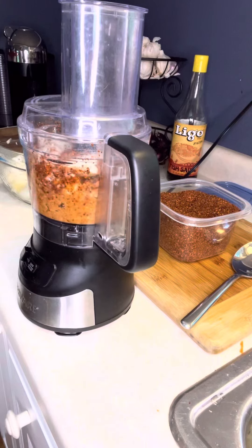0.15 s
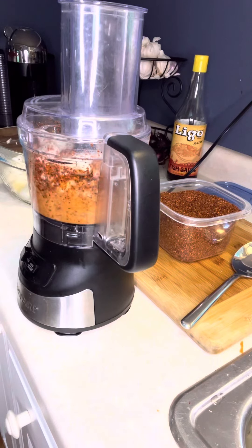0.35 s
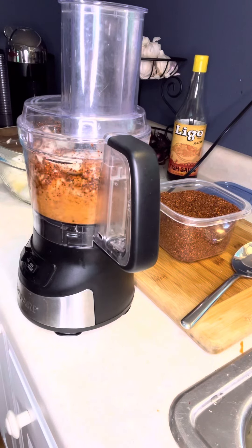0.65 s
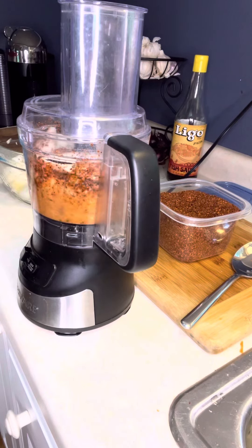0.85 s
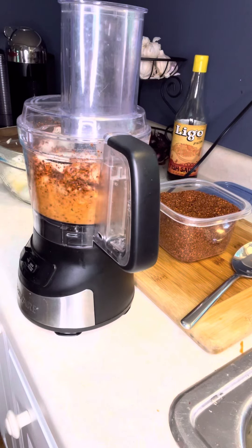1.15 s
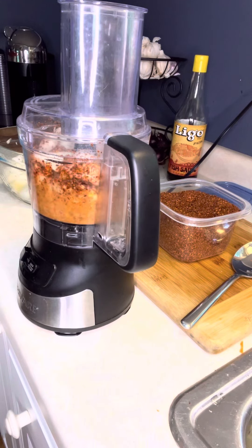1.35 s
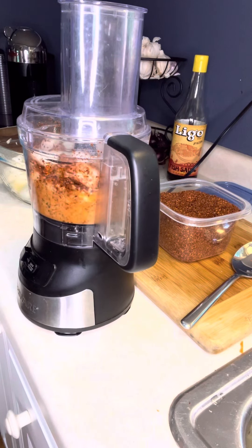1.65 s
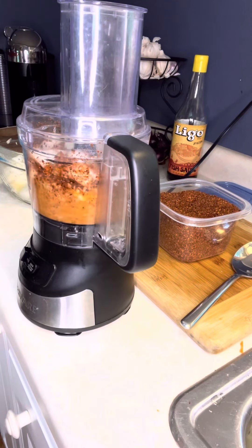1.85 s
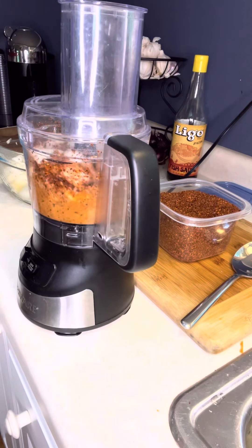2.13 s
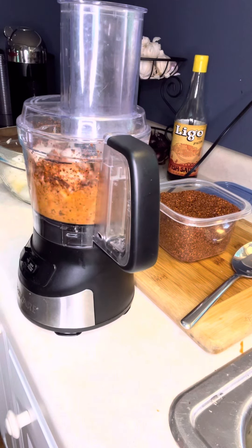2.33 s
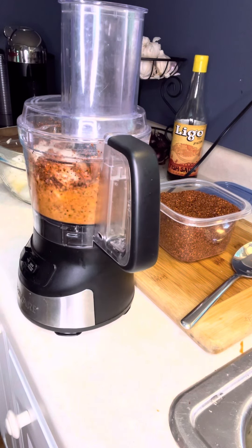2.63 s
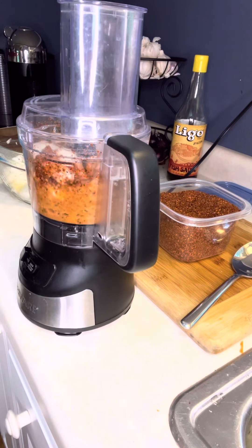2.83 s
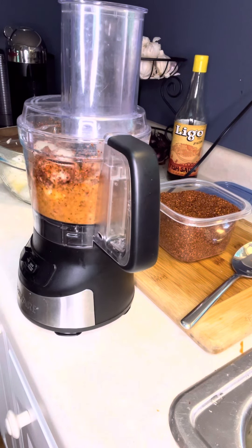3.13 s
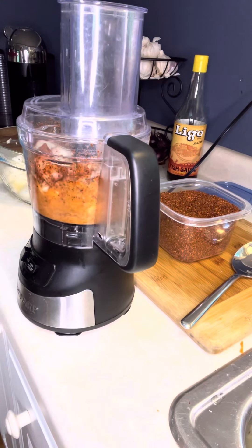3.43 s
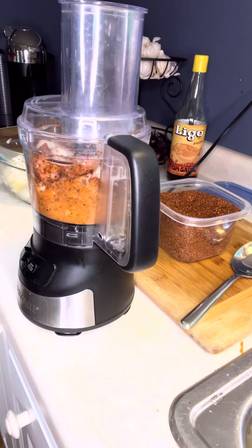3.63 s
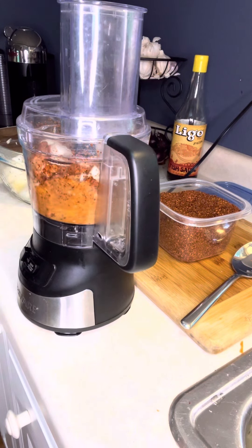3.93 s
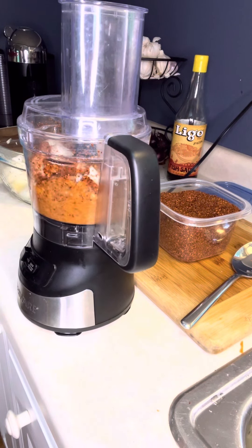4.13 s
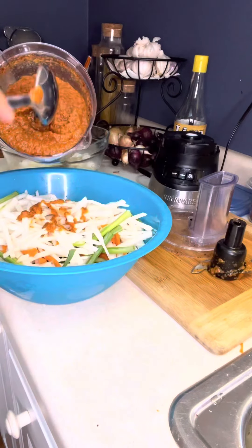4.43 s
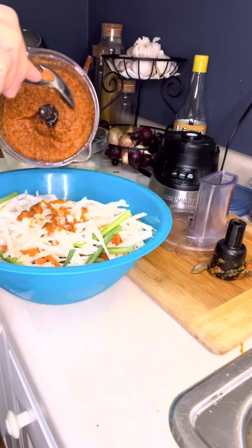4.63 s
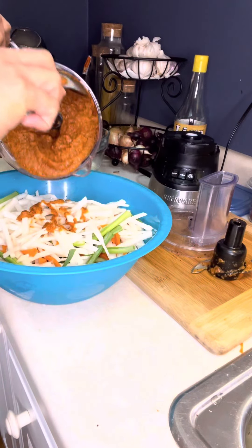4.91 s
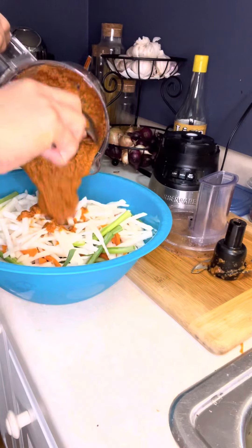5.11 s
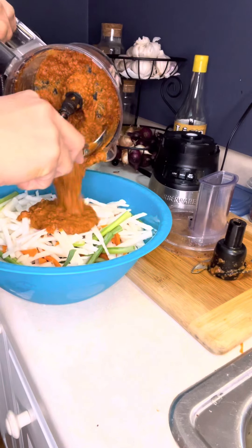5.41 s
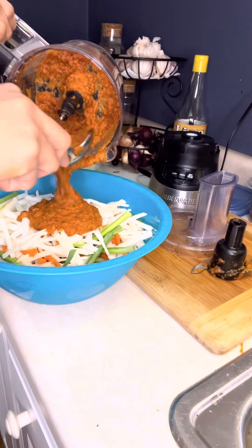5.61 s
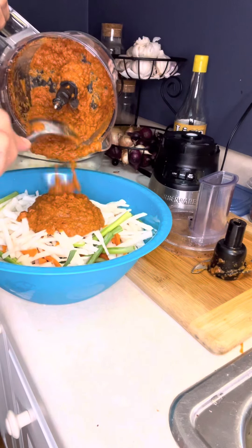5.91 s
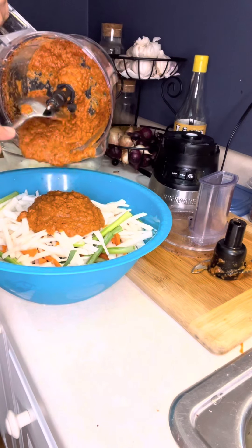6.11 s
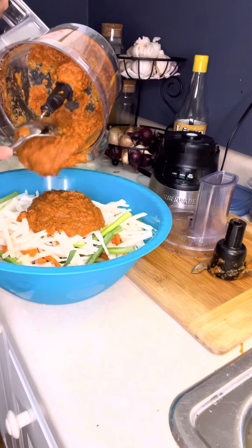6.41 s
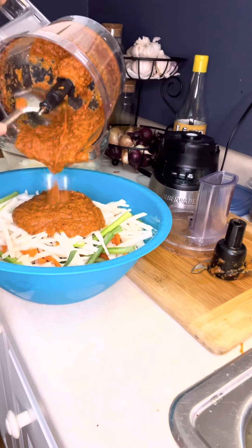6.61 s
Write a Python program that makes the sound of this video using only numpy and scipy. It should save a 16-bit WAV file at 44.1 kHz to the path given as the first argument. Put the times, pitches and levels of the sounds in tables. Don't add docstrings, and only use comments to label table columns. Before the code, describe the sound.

A small food processor grinds wet paste with a loud rattling roar, cuts off abruptly, then a metal spoon knocks and scrapes a plastic bowl.

```python
import sys
import numpy as np
from scipy import signal
from scipy.fft import rfft, irfft, next_fast_len
from scipy.io import wavfile

SR = 44100
rng = np.random.default_rng(int(sys.argv[2]) if len(sys.argv) > 2 else 0)


def ratio(d):
    e = np.asarray(d, float) / 20
    return 10 ** e


def to_wav(s):
    ch = np.atleast_2d(s).T
    pcm = np.round(np.clip(ch, -1, 1) * 32767)
    wavfile.write(sys.argv[1], SR, pcm.astype(np.int16))


N = 298116
T = np.arange(N) / SR
SIZE = next_fast_len(N + SR)
HZ = np.fft.rfftfreq(SIZE, 1 / SR) + 1e-3


def rms_one(x):
    return x / np.sqrt(np.mean(x ** 2) + 1e-20)


def at_hz(points, hz=HZ):
    points = np.array(points)
    return np.interp(np.log(hz), np.log(points[:, 0] + 1e-3), points[:, 1])


def filtered(x, response):
    return irfft(rfft(x, SIZE) * response, SIZE)[..., :N]


def band_pass(x, order, low_hz, high_hz):
    return signal.sosfilt(signal.butter(order, [low_hz, high_hz], "band", fs=SR, output="sos"), x)


def drift(rate_hz):
    r = np.exp(-80 * np.pi * rate_hz / SR)
    slow = signal.lfilter([1], [1, -2 * r, r * r], rng.standard_normal(N // 40 + 2002))[2000:]
    return np.interp(np.arange(N) / 40, np.arange(len(slow)), rms_one(slow))


def clicks_at(times, db):
    out = np.zeros(N)
    out[(np.asarray(times) * SR).astype(int)] = ratio(db)
    return out


def ring(clicks, hz, t60):
    r, w = ratio(-60 / (t60 * SR)), 2 * np.pi * hz / SR
    return signal.lfilter([0, np.sin(w)], [1, -2 * r * np.cos(w), r * r], clicks + 1e-18)


def grains(per_s, spread_db):
    sizes = ratio(spread_db * np.minimum(rng.exponential(1, N), 4)) * rng.choice([-1, 1], N)
    return rms_one(sizes * (rng.random(N) < per_s / SR))


def burst(times, db, low_hz, high_hz, t60):
    dying = signal.lfilter([1], [1, -ratio(-60 / (t60 * SR))], clicks_at(times, db) + 1e-18)
    dying = signal.lfilter([.04], [1, -.96], dying)
    noise = band_pass(dying * rng.standard_normal(N), 2, low_hz, min(high_hz, 19000))
    return noise * np.sqrt(SR / 2 / (high_hz - low_hz))


# pitch_hz, lead_rad
PORT_LEAD = [(0, 0), (1380, -0.3), (1640, -0.2), (2760, -0.6), (3360, -0.1), (3960, -0.1), (4310, -0.4),
             (4820, -3.0), (5600, -3.8), (7490, -4.3), (9130, -4.9), (9990, -5.2), (11200, -6.3),
             (16600, -6.3)]
# pitch_hz, level_db
PORT_TILT = [(60, 0.0), (110, 0.5), (200, 1.0), (380, 1.5), (700, 1.5), (1290, 1.0), (2380, 1.0),
             (4400, 0.0), (8120, 0.0), (15000, 0.0)]


def ports():
    return np.exp(.5j * np.interp(HZ, *np.transpose(PORT_LEAD))) * ratio(.5 * at_hz(PORT_TILT))


# start_s, speed_turns_per_s
MOTOR_SPEED = [
    (0.0, 61.6),
    (0.15, 61.3),
    (0.55, 60.7),
    (1.0, 60.9),
    (1.55, 61.1),
    (1.8, 61.7),
    (2.55, 61.97),
    (3.35, 62.15),
    (4.15, 61.9),
]
# start_s, lift_db
HARD_CHUNKS = [
    (0.008, 0.5),
    (4.295, 2),
]
# multiple_of_shaft_rate, level_db (rms), wobble_db
HUM_LINES = [(1.99, -47, 4), (2.965, -41, 0.5), (4.02, -54.5, 0), (4.986, -39.5, 2.5), (5.926, -47, 2),
             (8.07, -47.5, 4.5), (32.05, -41, 5.5), (33.1, -36.5, 3.5)]
# pitch_hz, level_db (per Hz)
ROAR_COLOUR = [(35, -29.5), (60, -16), (90, -13.5), (140, -17), (165, -5.5), (260, -7), (440, -4),
               (620, -10.5), (830, -7), (1520, -10.5), (2000, -5.5), (3080, -7.5), (4160, -11), (5200, -17)]
# pitch_hz, level_db (per Hz)
HISS_COLOUR = [(3500, -17), (5000, -2.5), (6000, -1), (8000, -2.5), (10000, -4.5), (12000, -8.5),
               (15700, -6.5)]
# pitch_hz, width_hz, lift_db
HOUSING_MODES = [(167.4, 6.8, 5), (846.6, 48, 8), (1434, 24, 5), (1532, 99, -5.5), (1817, 320, 5.5),
                 (2012, 86, 9), (2084, 20, 6), (2449, 304, -11), (2860, 60, 3.5), (3144, 260, 3),
                 (3540, 250, -6.5), (4194, 250, 4), (5800, 1100, 4), (6585, 120, 10.5), (8550, 73, 11)]
# pitch_hz, level_db
WALL_SCATTER = [(60, -35.5), (200, -27), (600, -22), (1300, -6), (2500, -9), (4500, -4), (7000, -5),
                (11000, -2)]


def motor_hum(turns, shaft):
    easy_turns, labour_turns = 61.35, 61.05
    labour = np.clip((easy_turns - turns) / (easy_turns - labour_turns), 0, 1)
    hum = ratio(-43) * np.sin(shaft)
    hum = hum + ratio(-40.5 - 8 * labour) * np.sin(.869 * shaft)
    for k, db, wobble_db in HUM_LINES:
        phase = k * shaft + (0.32 + 0.046 * k) * drift(3.5)
        hum = hum + ratio(db + wobble_db * drift(2.0 + 0.097 * k)) * np.sin(phase)
    slots = 49.95 * shaft + 0.5 * drift(5.0)
    whine_left = np.clip((61.75 - turns) / .4, 0, 1)
    whine = np.sin(slots) + ratio(-4) * np.sin(.96 * slots)
    return hum + ratio(-37.5 + 1.5 * drift(4.8)) * whine_left * whine


def processor():
    turns = np.interp(T, *np.transpose(MOTOR_SPEED))
    shaft = 2 * np.pi * np.cumsum(turns) / SR
    hum = motor_hum(turns, shaft)

    lift_db = sum(db / (1 + (2 * (HZ - hz) / width) ** 2) for hz, width, db in HOUSING_MODES)
    housing = np.array([ratio(lift_db), ratio(.3 * lift_db + at_hz(WALL_SCATTER))])
    throb = 0.081 * np.sin(shaft) + 0.019 * np.sin(.869 * shaft) + 0.064 * np.sin(2 * np.pi * 120 * T)
    straight_only = [[1], [0]]

    chatter = rng.standard_normal((2, N)) + 0.66 * grains(1500, spread_db=1.5) * straight_only
    chatter = chatter * (1 + throb) * ratio(0.89 * drift(16))
    roar = filtered(chatter, ratio(at_hz(ROAR_COLOUR)) * housing / (1 + (HZ / 5600) ** 8))

    air = rng.standard_normal((2, N)) + .4 * grains(900, spread_db=4.5) * straight_only
    air = air * (1 + 1.1 * throb) * ratio(0.75 * drift(26))
    hiss = filtered(air, ratio(at_hz(HISS_COLOUR)) * housing * (HZ < 15800))

    chunk_db = sum(db * np.exp(-((T - s) / 0.036) ** 2) for s, db in HARD_CHUNKS)
    noise = ratio(-25.5 + chunk_db) * rms_one(roar) + ratio(-30.4 + .3 * chunk_db) * rms_one(hiss)
    straight, scattered = noise
    straight = straight + np.sqrt(2) * hum
    step = ports()
    return filtered(np.array([straight + scattered, straight - scattered]), np.array([step, 1 / step]))


# pitch_hz, level_db (rms)
FRIDGE_LINES = [(60, -67.5), (120, -65.5), (240, -57), (335, -74.5), (407, -74.5), (500, -77.5)]
# pitch_hz, level_db (per Hz)
AIR_COLOUR = [(30, -25.5), (60, -8.5), (85, -9.5), (170, -4.5), (300, -11.5), (450, -13), (700, -23),
              (1300, -31.5), (2150, -29), (3000, -32.5), (4700, -38), (6000, -45), (9000, -76),
              (12000, -88)]


def kitchen_floor():
    fridge = 0
    for hz, db in FRIDGE_LINES:
        fridge = fridge + np.sqrt(2) * ratio(db + 1.9 * drift(2.8)) * np.sin(2 * np.pi * hz * T)
    mid, side = rng.standard_normal((2, N)) * ratio(0.7 * drift(8))
    side = filtered(side, HZ / (HZ + 1200))
    air = filtered(np.array([mid + side, mid - side]), ratio(at_hz(AIR_COLOUR)))
    return fridge * ratio(np.array([[1.3], [-1.3]])) + ratio(-59) * rms_one(air)


# start_s, level_db (peak), pitch_hz, t60_s
EDGE_CATCHES = [(4.876, -39.5, 4200, 0.018), (4.928, -42, 2600, 0.017), (5.265, -55, 12500, .012),
                (5.345, -55, 12000, .012), (5.508, -63, 13000, .01), (5.78, -55, 11000, .01),
                (5.38, -53, 6000, .01), (5.655, -50, 3300, .01), (5.928, -60, 4200, 0.014),
                (5.943, -51, 6000, 0.013), (5.979, -52, 2500, 0.016), (6.147, -32.5, 895, .03),
                (6.152, -30, 2500, 0.067), (6.5, -47, 9000, 0.018), (6.502, -48.5, 2000, .015),
                (6.549, -57, 10000, .01), (6.565, -50, 6500, .015), (6.598, -47, 2400, 0.056),
                (6.7253, -36, 8500, .012), (4.878, -51, 11000, .015), (6.606, -37, 2300, 0.072)]
# start_s (at full effort), hold_s, level_db (wet hiss)
PASTE_STROKES = [
    (5.043, .02, -56.5),
    (6.212, .19, -58.5),
    (6.747, .05, -52.5),
]


def spoon_drag():
    ticks = sum(burst([s], db - 2.5, hz / 1.35, hz * 1.5, t60) for s, db, hz, t60 in EDGE_CATCHES)

    rest_db, rise_db_per_s, fall_db_per_s = -72, 128, 59
    wet_db = rest_db
    for s, hold, db in PASTE_STROKES:
        rise_db = rise_db_per_s * np.maximum(s - T, 0)
        fall_db = fall_db_per_s * np.maximum(T - s - hold, 0)
        wet_db = np.maximum(wet_db, db - rise_db - fall_db)
    wet = grains(3000, spread_db=1.0) * ratio(6.4 * drift(25))
    slide = signal.sosfilt(signal.butter(1, [1200, 5000], "band", fs=SR, output="sos"), wet)

    dry_grains = grains(2500, spread_db=4.5) * ratio(4.0 * drift(14))
    rustle = 0
    for low, high in [(5500, 8500), (8500, 11500), (11500, 15000)]:
        rustle = rustle + band_pass(dry_grains * ratio(4.5 * drift(5)), 2, low, high)
    rustle_db = -81.5 + 0.53 * (wet_db - rest_db)
    sliding = ratio(wet_db - 1) * rms_one(slide) + ratio(rustle_db) * rms_one(rustle)
    return ticks + sliding * (T > 4.92)


# start_s, level_db (peak), pitch_hz (main ring), spoon_ring_db, crack_db
BOWL_KNOCKS = [(4.878, -25, 453, -43, -31), (4.934, -17, 1130, -16, -14.5), (4.94, -18.5, 435, -7, -17.5),
               (5.059, -18, 477, -21, -11), (5.064, -23.5, 750, -25, -17), (5.099, -28, 444, -16.5, -14),
               (5.145, -27.5, 480, -7.5, -20), (5.546, -46, 766, -15, -17), (5.587, -51, 781, -6, -12),
               (5.603, -34.5, 700, -8.5, -16.5), (5.705, -34.5, 544, -12, -18),
               (5.985, -37.5, 785, -5, -14.5), (5.992, -26, 466, -23, -34), (6.083, -30, 1140, -0.5, -24),
               (6.096, -29.5, 695, -7, -26), (6.161, -8, 538, -15, -17.5), (6.172, -18, 765, -26, -14),
               (6.298, -14.5, 377, -7.5, -9), (6.6114, -30.5, 613, 11, -8.5), (6.646, -13, 510, -17.5, -8),
               (6.726, -19, 860, -10.5, -26), (6.741, -25.5, 756, -3, -8.5)]
# delay_s, loss_db, pitch_hz (main ring), spoon_ring_db, crack_db
SECOND_LANDING = (.0025, -6, 701, -42, -13)
# pitch_hz, level_db, t60_s
BOWL_MODES = [(414, -0.5, 0.02), (491, -3, 0.085), (581, -7.5, 0.092), (693, -5, 0.058), (787, -3, .06),
              (863, -4, 0.056), (919, -1, 0.046), (1053, 4, 0.042), (1260, 1, 0.032)]
# pitch_hz, level_db, t60_s, need_of_flat_blow (share of spoon_ring_db)
SPOON_MODES = [(1493, -9.5, 0.048, 1.1), (1842, -6, 0.036, 0.98), (1990, -2.5, .045, 0.97),
               (2170, -10, 0.044, 1.2), (2640, -9, 0.046, 1.3), (2980, -9, 0.03, 1.2),
               (4090, -23, 0.018, 1.9)]
# start_s, level_db
BOWL_SHOVES = [(4.935, -32.5), (4.94, -47), (5.059, -56), (5.1, -47.5), (5.144, -43), (5.546, -61),
               (5.704, -58), (5.992, -59), (6.161, -30), (6.297, -53), (6.646, -29), (6.726, -60)]
# low_hz, high_hz, level_db, dullness (extra loss of soft blows, dB per dB), t60_s
CLATTER_BANDS = [(977, 2400, -1, .1, 0.03002), (2400, 3920, 4.5, 0.099, 0.018),
                 (3970, 8500, 6.5, 0.73, .012), (9000, 24000, -3.5, 0.48, 0.011)]


def spoon_knocks():
    delay_s, loss_db, *landing = SECOND_LANDING
    again = [(s + delay_s, db + loss_db, *landing) for s, db, *_ in BOWL_KNOCKS if db > -18]
    s, peak_db, main_hz, spoon_db, crack_db = np.transpose(BOWL_KNOCKS + again)
    luck_db = 2.0 * rng.standard_normal((len(s), 20))

    bowl = 0
    for k, (hz, db, t60) in enumerate(BOWL_MODES):
        mode_db = peak_db + db - 31 * abs(np.log2(hz / main_hz)) + luck_db[:, k]
        bowl = bowl + ring(clicks_at(s, mode_db) * np.sign(k % 2 - .5), hz, t60)

    shove_s, shove_db = np.transpose(BOWL_SHOVES)
    thump = ring(clicks_at(shove_s + 0.0035, shove_db + 7.0), 248, 0.044)
    thump = thump + ring(clicks_at(shove_s + .002, shove_db), 118, 0.072)

    spoon = 0
    for k, (hz, db, t60, flat) in enumerate(SPOON_MODES):
        mode_db = peak_db + flat * spoon_db + db + luck_db[:, 10 + k]
        spoon = spoon + ring(clicks_at(s, mode_db), hz, t60)
    spoon = signal.lfilter([.3], [1, -.8], spoon) * (1 + 0.56 * drift(30))

    clatter = 0
    for low, high, db, dull, t60 in CLATTER_BANDS:
        clatter = clatter + burst(s, peak_db + crack_db + db + dull * (crack_db + 12), low, high, t60)
    snap = band_pass(clicks_at(s, peak_db + crack_db + 11.5), 2, 1800, 7000)
    soft = signal.lfilter([.04], [1, -1.6, .64], bowl + thump) * 1.2
    return signal.sosfilt(signal.butter(2, 90, "high", fs=SR, output="sos"), soft + spoon + clatter + snap)


# start_s, level_db
BLADE_TAPS = [
    (5.984, -33.5),
    (6.083, -27.5),
    (6.097, -29),
    (6.16, -19),
    (6.61, -16.5),
    (6.647, -23),
    (6.742, -34.5),
]
# pitch_hz, t60_s
SPOON_BLADE = [(1625, 0.056), (1675, .16)]


def spoon_rings():
    s, db = np.transpose(BLADE_TAPS)
    out = 0
    for (hz, t60), mode_db in zip(SPOON_BLADE, (0, -16.5)):
        taps = clicks_at(s, db + mode_db)
        out = out + 1.31 * (ring(taps, hz, t60) - ring(taps, hz, 0.0091))
    return out * (1 + 0.38 * drift(27))


# pitch_hz, t60_s, level_db
ROOM_TAIL = [(100, 0.25, 3), (500, 0.27, -2), (1500, .38, -1), (4000, 0.27, 0.5), (8100, 0.14, -10.5),
             (14000, 0.25, -4)]


def heard(x, wet_db):
    age = np.arange(SR // 2) / SR
    tail = np.zeros((2, SR // 2))
    tail_level = np.array(ROOM_TAIL)[:, ::2]
    for low in 80 * 2 ** np.arange(8):
        band = band_pass(rng.standard_normal((2, SR // 2)), 2, low, min(2 * low, 20000))
        decay_db = at_hz(tail_level, 1.4 * low) - 60 * age / at_hz(ROOM_TAIL, 1.7 * low)
        tail += band * ratio(decay_db) * np.clip(age / 0.001 - .5, 0, 1)
    mid, side = rfft(tail / np.sqrt(np.sum(tail[0] ** 2)), SIZE)
    side = side * HZ / (HZ + 1500) * 1.6
    half = ports()
    left = half * (1 + ratio(wet_db) * (mid + side))
    right = (1 + ratio(wet_db) * (mid - side)) / half
    return filtered(x, np.array([left, right]))


def scene():
    change_s = 4.341
    running = np.clip((change_s - T) / .0015, 0, 1)
    machine = processor() * running
    floor = kitchen_floor()
    spoon = heard(spoon_drag() + spoon_knocks() + spoon_rings(), wet_db=-12.5)
    return machine + (spoon + floor) * (T > change_s)


def top_cut(x):
    return signal.sosfilt(signal.butter(12, 17030, fs=SR, output="sos"), x)


def record(dry):
    dropout = 1 - .997 * np.exp(-((HZ - 4875) / 110) ** 4)
    mid = filtered(dry[0] + dry[1], dropout / (1 + (HZ / 16300) ** 80))
    side = filtered(dry[0] - dry[1], 1 / (1 + (HZ / 10900) ** 60))
    return top_cut(.5 * np.array([mid + side, mid - side]))


dry = scene()
out = record(dry)
to_wav(out)
```